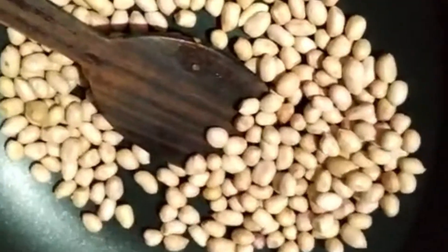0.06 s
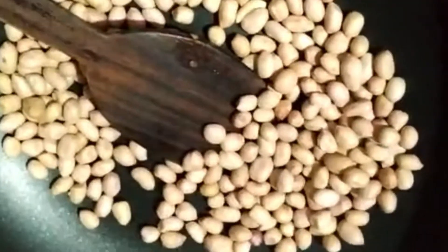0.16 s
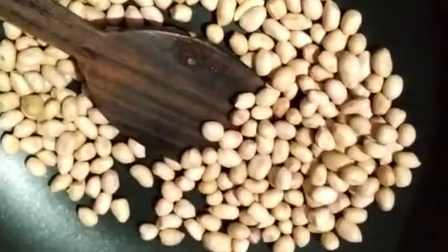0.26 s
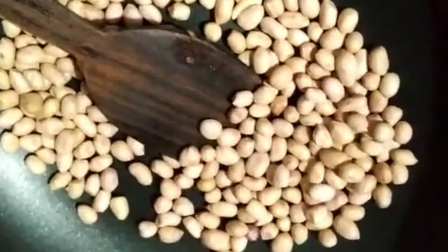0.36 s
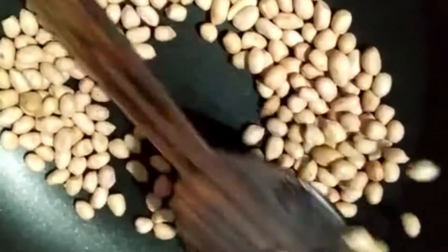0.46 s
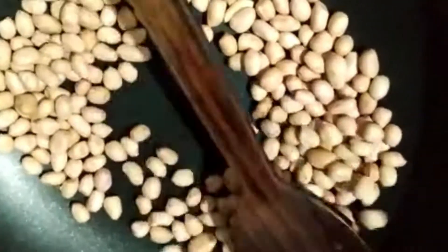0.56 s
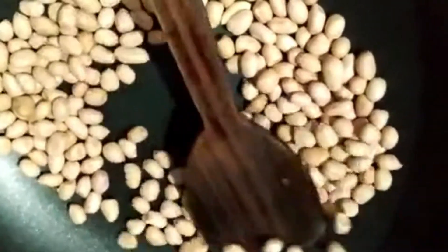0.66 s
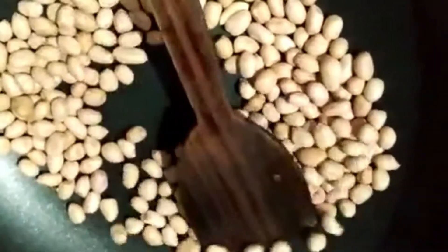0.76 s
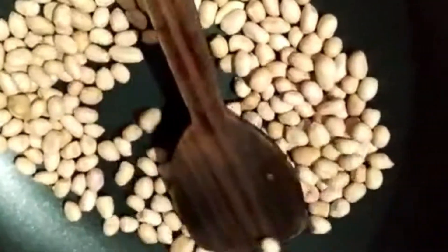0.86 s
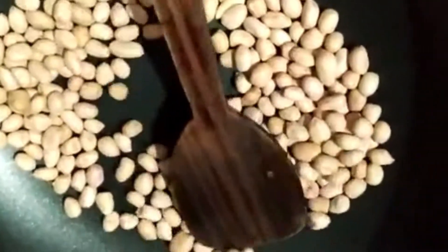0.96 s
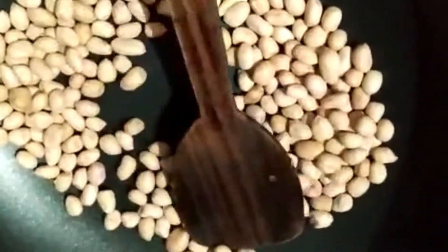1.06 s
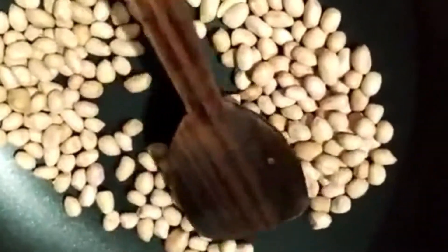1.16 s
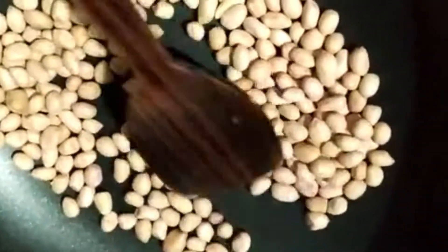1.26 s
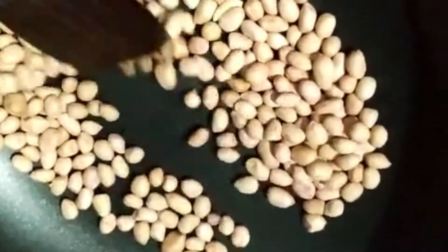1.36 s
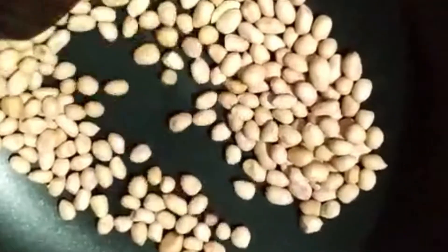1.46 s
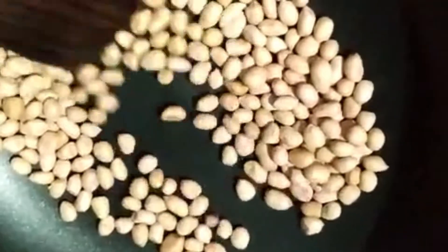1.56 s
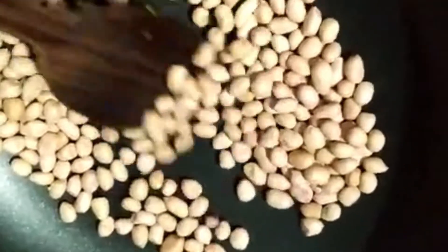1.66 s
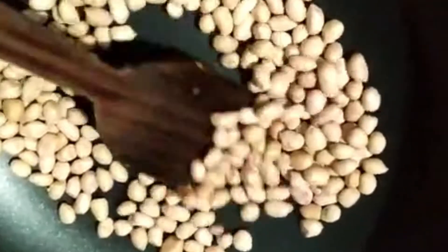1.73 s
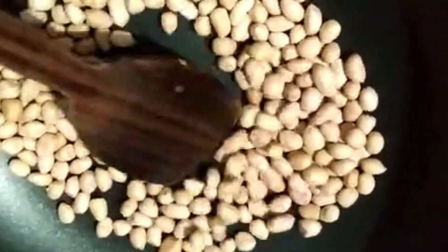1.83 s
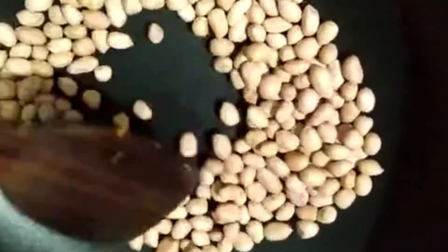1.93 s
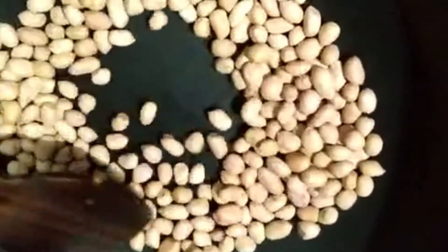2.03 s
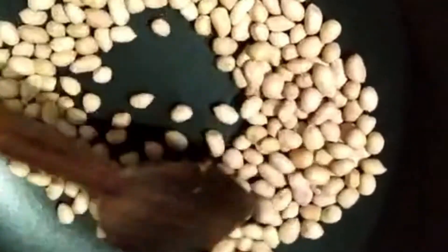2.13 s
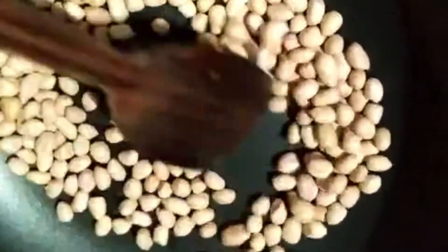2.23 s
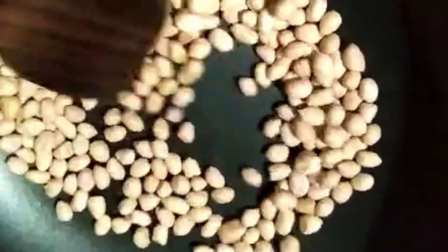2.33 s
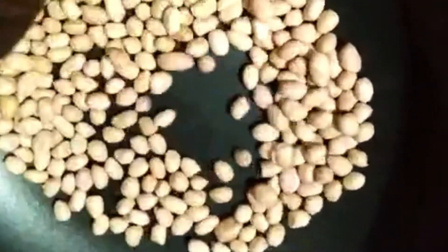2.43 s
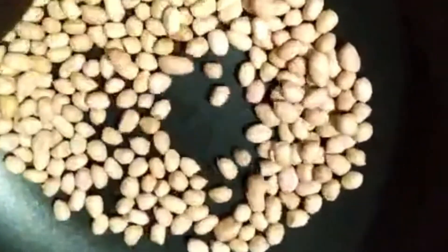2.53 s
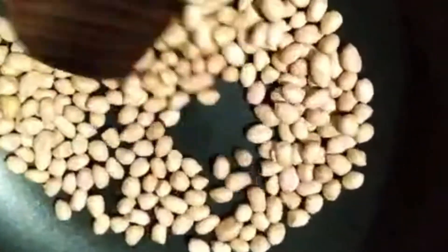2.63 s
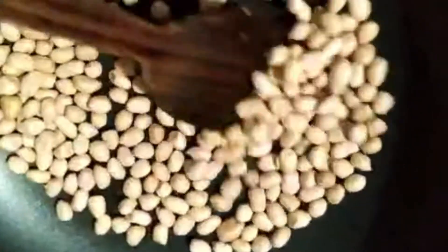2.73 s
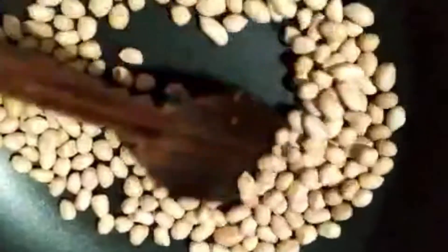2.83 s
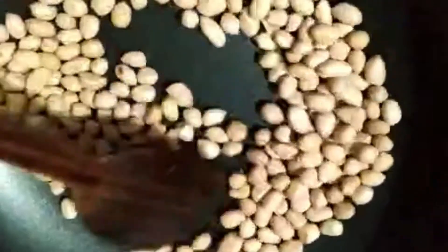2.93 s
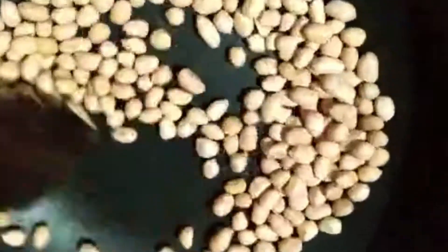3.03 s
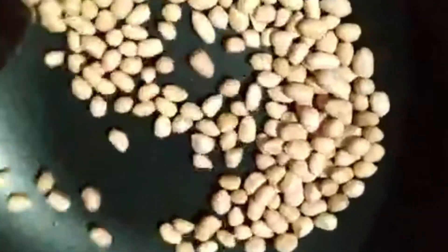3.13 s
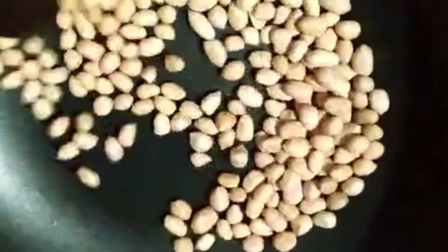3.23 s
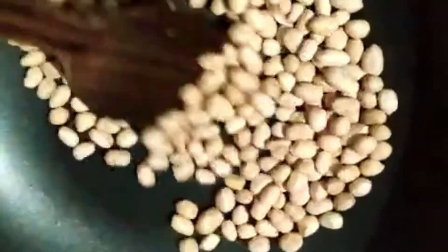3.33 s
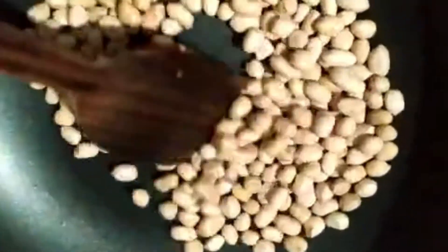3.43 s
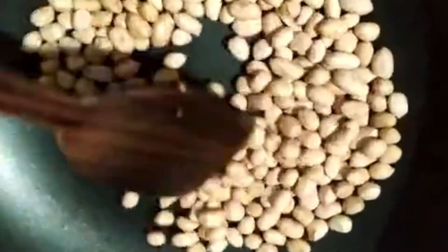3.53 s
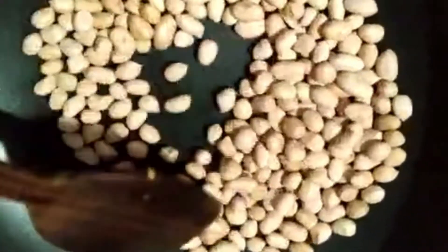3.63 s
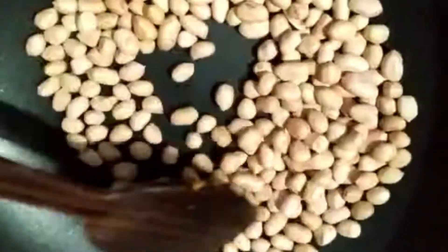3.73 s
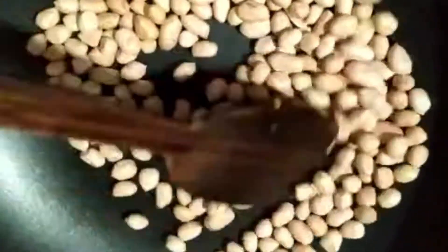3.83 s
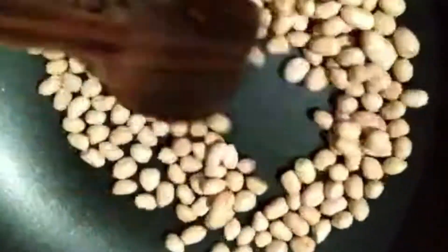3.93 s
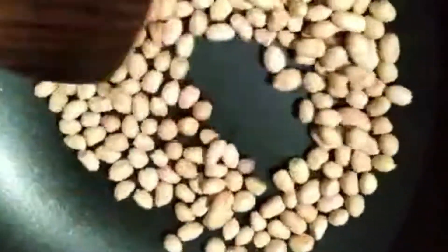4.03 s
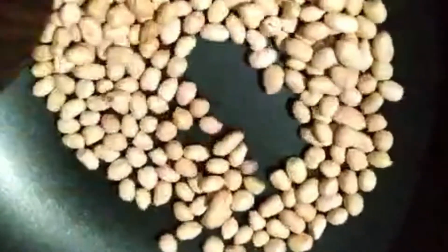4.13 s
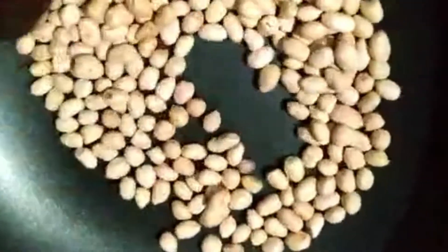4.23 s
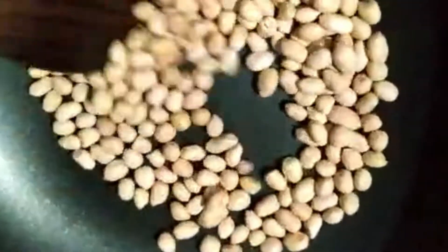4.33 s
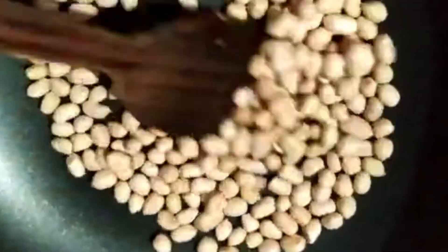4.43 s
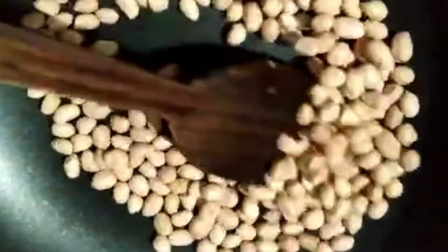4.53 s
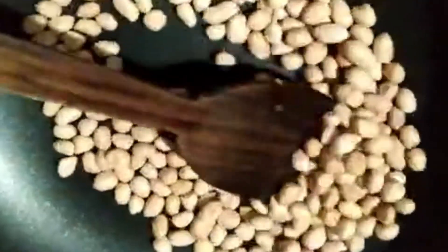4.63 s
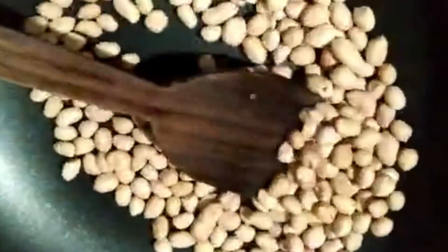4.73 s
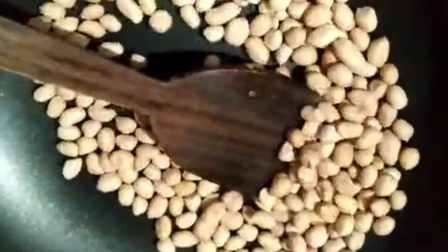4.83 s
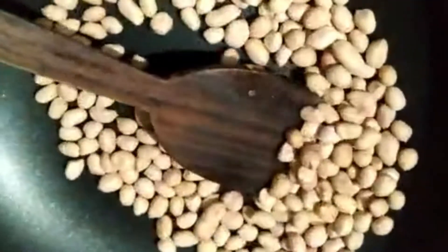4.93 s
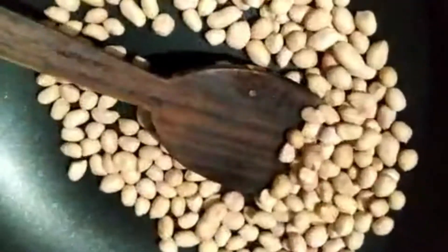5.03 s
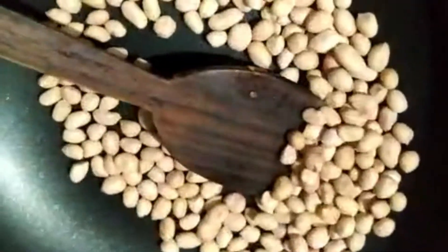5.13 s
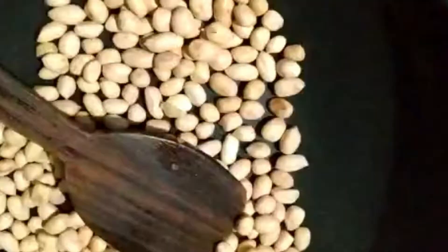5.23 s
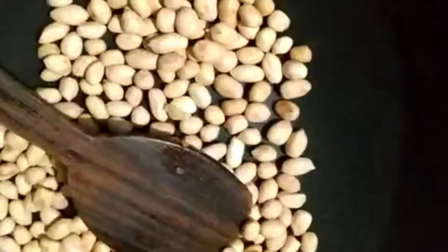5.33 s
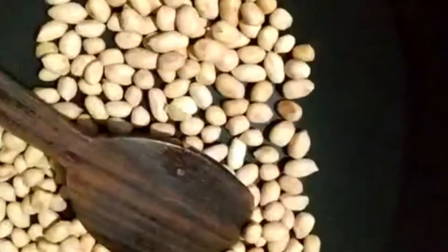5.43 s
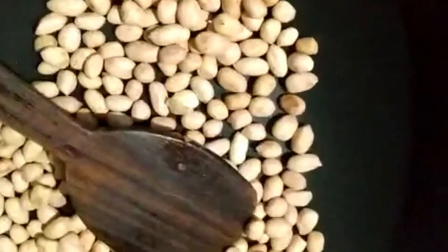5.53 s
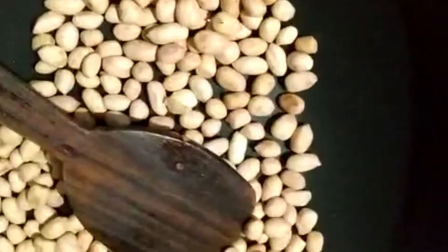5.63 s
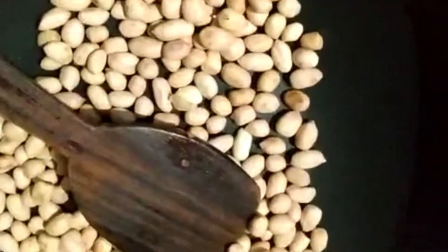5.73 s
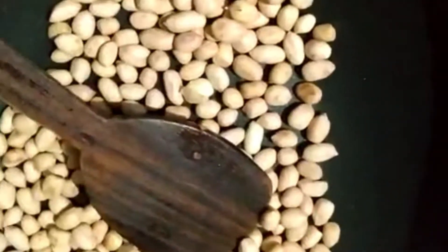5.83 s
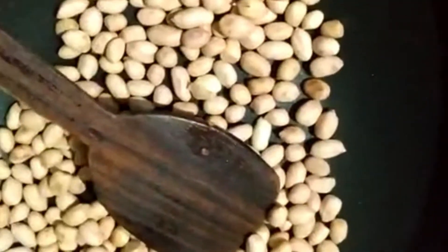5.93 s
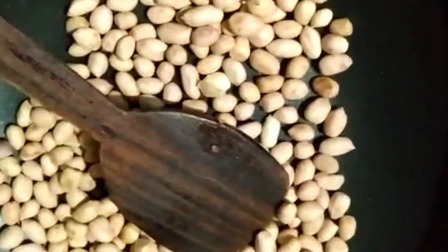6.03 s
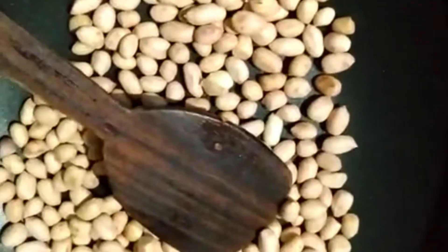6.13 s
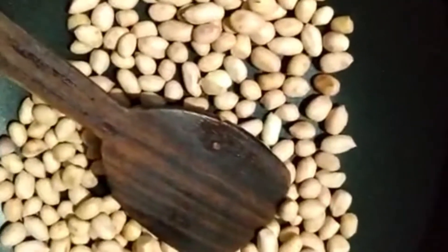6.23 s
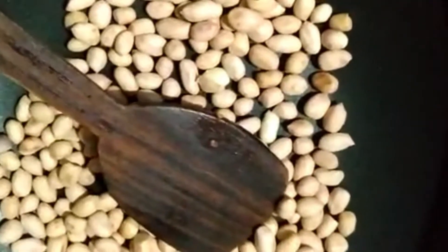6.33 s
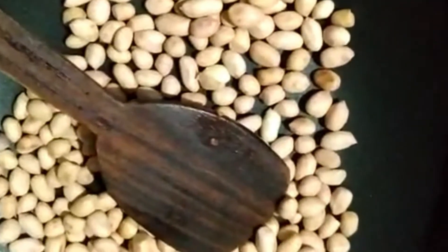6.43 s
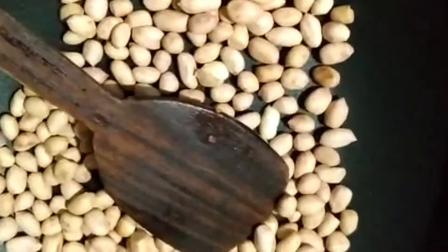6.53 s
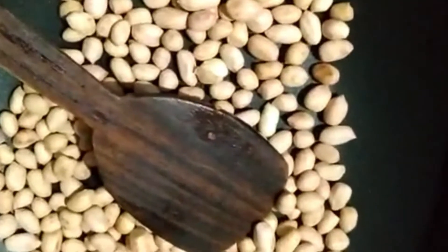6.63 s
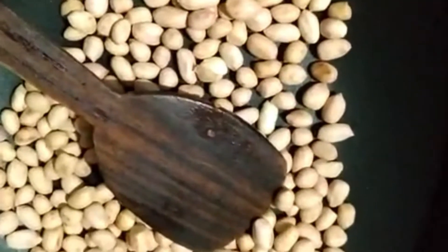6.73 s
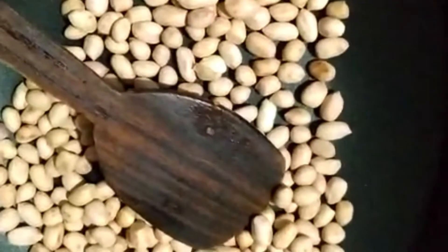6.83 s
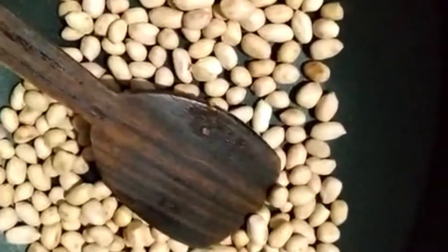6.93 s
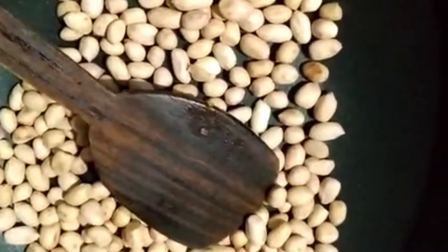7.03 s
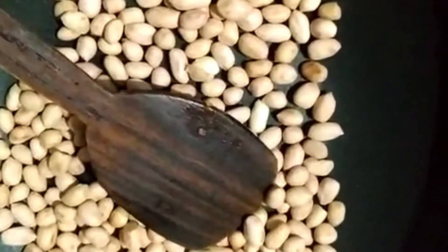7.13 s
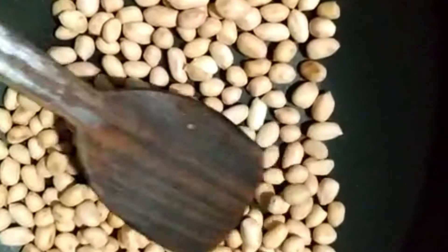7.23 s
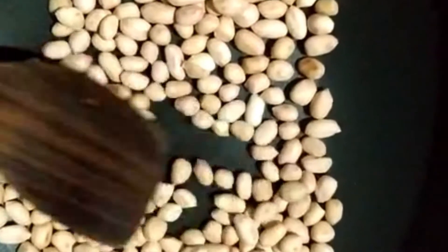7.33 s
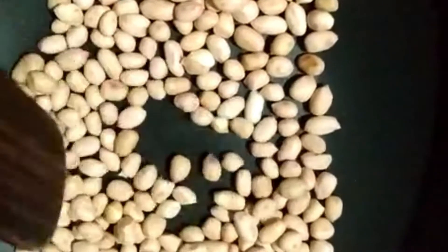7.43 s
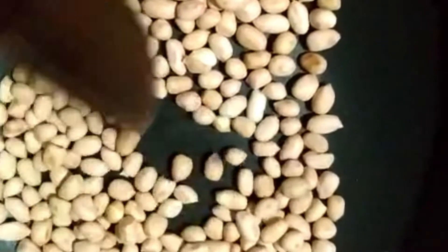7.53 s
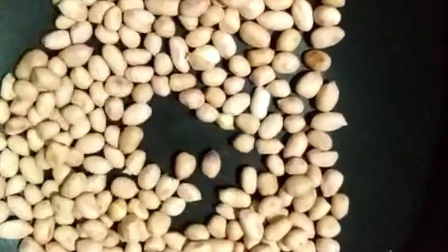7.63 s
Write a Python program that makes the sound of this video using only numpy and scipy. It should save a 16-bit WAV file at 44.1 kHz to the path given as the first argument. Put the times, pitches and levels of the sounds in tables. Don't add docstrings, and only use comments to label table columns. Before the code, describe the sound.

Raw peanuts rattle and tick in a dry metal pan as a wooden spatula knocks, slaps and scrapes, over a faint low motor hum.

```python
import sys
import numpy as np
from scipy import signal
from scipy.fft import rfft, irfft
from scipy.io import wavfile
from scipy.ndimage import uniform_filter1d

SR = 44100
rng = np.random.default_rng(int(sys.argv[2]) if len(sys.argv) > 2 else 0)


def output_pcm(signal):
    pcm = np.clip(np.atleast_2d(signal).T, -1, 1) * 32767
    wavfile.write(sys.argv[1], SR, np.round(pcm).astype(np.int16))


def to_linear_factor(level_db):
    exponent = np.asarray(level_db, float) / 20
    return 10 ** exponent


N = 338699
T = np.arange(N) / SR
F = np.fft.rfftfreq(N, 1 / SR)
OPPOSITE = np.array([[1], [-1]])

# f/Hz, level/dB per Hz
AIR = [(110, -15), (160, 7), (230, -2.5), (340, 0), (720, -9), (1600, -14), (2500, -17), (4000, -25.5),
       (6500, -28), (9000, -26), (13000, -28.5), (15500, -25)]
# f/Hz, width/Hz, level/dB
WHINES = [(4700, 150, -80.5), (7450, 380, -73), (10100, 170, -74), (335.6, 16, -63)]
# t/s, level/dB
JOLTS = [
    (.2, -35.5),
    (1.35, -42),
    (1.88, -43),
    (2.3, -41.5),
    (2.44, -47),
    (2.93, -47.5),
    (4.06, -42),
    (4.38, -57.5),
    (6.29, -48),
    (7.41, -43.5),
]
# f/Hz, spread/rad
LEAD = [(200, -21.5), (1000, 1.37), (2200, 1.05), (5000, 2), (15000, 0.5)]
# f/Hz, left minus right level/dB
TILT = [(60, 1.0), (110, -4), (200, 4.5), (380, -3), (700, 10.5), (1290, -9.5), (2380, 0.5), (4400, -6.5),
        (8120, -3.5), (15000, 0)]
# f/Hz, width/Hz, level/dB
BOWL = [(754, 270, -20.5), (929, 60, -4.5), (958, 32, -2.5), (1027, 19, 3.5), (1085, 58, 7.5),
        (1130, 58, -12.5), (1200, 79, -13.5), (1273, 50, -17.5)]
# f/Hz, width/Hz, level/dB
WALL = [(1596.6, 26, 2), (2097, 74, 7), (2338, 120, 2.5), (2617, 100, 3), (2864, 56, 2), (3404, 63, 0.5),
        (3933, 66, 1)]
# f/Hz, width/Hz, level/dB
RIM = [(4660, 120, -31), (4570, 67, -4), (5030, 50, 0), (5570, 92, 1.5), (6710, 18, -9.5), (7040, 360, 1),
       (7740, 70, -16), (8270, 42, -5), (8580, 83, -10.5), (9360, 41, -9), (9820, 340, -4.5),
       (10000, 350, -29.5), (10900, 79, -46.5), (11900, 190, -10)]
# f/Hz, level/dB per Hz
CRACK = [(180, -39), (300, -8.5), (603, -9), (1100, -10.5), (1480, 11.5), (4990, -15), (7570, -17),
         (8640, -15.5), (13300, -22.5), (16000, -27)]
# t/s, peak level/dB
BUMPS = [(.173, -24), (.2908, -22), (.3115, -12), (.3327, -11.5), (.4069, -20.5), (1.3169, -26),
         (1.3447, -35), (2.2731, -22), (2.292, -33), (2.3252, -24.5), (3.0014, -22.5), (3.0287, -24),
         (3.5608, -29), (3.9721, -25), (4.0188, -32), (5.0332, -43.5), (5.154, -50), (7.374, -29),
         (7.4574, -33)]
# t/s, peak level/dB
SLAPS = [
    (0.2907, -5.5),
    (1.3453, -11),
    (2.4236, -12),
    (2.7583, -19),
    (3.4047, -27.5),
    (4.118, -8.5),
    (7.4938, -6),
]
# t/s, peak level/dB, bowl level/dB re peak, bright level/dB re peak, bowl pitch f/Hz
BLOWS = [(.1507, -38, 14.5, 4, 850), (.173, -18, 9.5, 1, 900), (0.2901, -14.5, 3, 0, 1200),
         (0.3116, -21.5, 6, -11, 887), (.3327, -19, 7.5, -1.5, 803), (.378, -13.5, -13, -0.5, 1145),
         (.4069, -19, -7, -24, 1210), (1.0855, -8.5, -14.5, -10.5, 990), (1.3153, -16.5, -25, -10, 1030),
         (1.3447, -10.5, 4.5, 2.5, 996), (1.386, -18.5, 3.5, 0, 1130), (1.4199, -11.5, 1.5, -29, 1097),
         (1.459, -25, 9, -15, 1000), (2.293, -38, -16, 9, 920), (2.4215, -4.5, -1.5, -9, 1031),
         (3.0014, -29.5, 17, -18, 688), (3.0285, -22, 1, -2, 1030), (3.0682, -8.5, -14, -4.5, 1110),
         (3.9717, -24, -20, -3.5, 880), (4.118, -5.5, -2, -16.5, 1070), (4.1533, -17.5, 7, -9.5, 1140),
         (7.374, -33.5, 3.5, 2.5, 610), (7.458, -14, 0, -14, 1050), (7.493, -13.5, 12.5, 3.5, 1010)]
# t/s, peak level/dB, bowl level/dB re peak
DROPS = [(0.4545, -18, -15), (0.635, -28, 6), (0.779, -27, -1), (1.0306, -18, -12), (1.064, -18, -13),
         (1.1578, -20.5, -4.5), (1.7694, -26, -12), (2.124, -28.5, 5.5), (2.218, -20.5, -34),
         (2.6381, -13, -25), (2.7591, -17.5, -5), (2.837, -23, -17), (3.1977, -17.5, -5),
         (3.3122, -18, -1.5), (3.4038, -25, -8.5), (3.641, -19, -12), (4.0714, -13, -9), (4.265, -30, -5),
         (4.2841, -25, 3), (4.3254, -14.5, -32), (4.4779, -18.5, -6), (4.51, -27.5, -3.5),
         (4.5273, -27, -7), (5.0318, -40, 0), (6.8637, -39.5, -7), (6.93, -51, 6), (7.428, -21.5, -9),
         (7.5694, -17.5, 3), (7.596, -17, -2), (7.617, -19.5, 0)]
# t/s, peak level/dB, bowl level/dB re peak, bright level/dB re peak
CLICKS = [(0.1238, -34.5, -10, -2.5), (0.2322, -35, -2, 4), (0.27, -29, -3, 4), (.5289, -29, -6, -4),
          (0.563, -39.5, 10.5, 2), (0.71, -40, 6, -4), (.9464, -30.5, -14, -3.5), (1.0036, -31, -9, -1.5),
          (1.2003, -35.5, 3.5, 0.5), (1.25, -33.5, -18, -7.5), (1.511, -39, -5, -3.5),
          (1.5428, -18.5, -17, -8.5), (1.5677, -19.5, -5.5, -11), (1.6254, -37, 4, -21),
          (1.6553, -20.5, -1, -10.5), (1.6909, -19.5, -0.5, -10), (1.721, -22.5, -5, -14),
          (1.9718, -19, -19, -8), (2.3266, -21, -6, -7), (2.3535, -20.5, -4.5, -10), (2.4013, -35, 12, -46),
          (2.6918, -37.5, 12, -9), (2.9226, -16.5, -29, -30), (2.9644, -31, -8, -0.5),
          (3.69, -24.5, -7, -2), (3.8588, -27, -2.5, -13), (4.431, -16, -13, -15), (5.154, -55.5, 12, -10),
          (7.6367, -33, 12, -12), (7.66, -35, 9, -14)]
# t/s, peak level/dB
MORE_NUTS = [(1.8922, -29), (1.926, -38), (2.254, -38), (2.614, -37), (3.14, -26), (3.51, -36), (3.745, -31.5),
             (3.901, -41), (4.0208, -26.5), (4.462, -51), (6.89, -58), (7.114, -54)]
# fastest t/s, level/dB, rise t/s, fall t/s, scrape level/dB re level
STROKES = [(.175, -26.5, 0.059, 0.09, -26), (.235, -39, 0.018, 0.055, 18),
           (0.309, -21.5, 0.049, 0.076, -18), (.38, -28.5, 0.12, 0.12, 1), (0.458, -39, 0.11, 0.58, -6.5),
           (1.078, -25, .11, 0.16, -9), (1.36, -28, .03, 0.35, -9), (1.429, -25, 0.17, 0.12, -5),
           (1.65, -46, 1, .25, -10), (2.032, -30.5, 0.24, 0.17, -2), (2.3, -37, 1, .3, -13),
           (2.439, -20, 0.077, .08, -5), (2.77, -31.5, 0.41, 0.24, -3), (3.058, -16.5, 0.062, .11, -8),
           (3.268, -29.5, 0.98, 0.074, -14), (3.52, -39.5, 0.15, 0.38, -2), (3.708, -23.5, 0.13, 0.12, -13),
           (4.135, -15.5, 0.028, 0.13, -7.5), (4.35, -32.5, 0.6, 0.23, -9.5), (4.5, -48.5, .3, 0.12, -11.5),
           (6.87, -55.5, .02, 0.24, -7), (7.066, -31.5, 0.072, 0.076, -27.5),
           (7.451, -30.5, 0.05, 0.18, -13), (7.55, -30, .055, 0.38, -2)]


def unit(x):
    return x / np.sqrt(np.mean(x ** 2))


def over_hz(table, hz):
    f, v = np.transpose(table)
    return np.interp(np.log(np.maximum(hz, 1)), np.log(np.maximum(f, 1)), v)


def shaped(x, gain):
    return irfft(rfft(x) * gain, N)


def walk(rate):
    hold = int(SR / rate)
    steps = np.repeat(rng.standard_normal(N // hold + 1), hold)
    return 1.69 * uniform_filter1d(uniform_filter1d(steps, hold), hold)[:N]


def swells(s, db, rise_s, fall_s, rest_db):
    edge_db, edge_bend = 20, 1.243
    late = T - s[:, None]
    edge = np.where(late < 0, -late / np.abs(rise_s)[:, None], late / np.abs(fall_s)[:, None])
    swell_db = db[:, None] - edge_db * np.minimum(edge, 9) ** edge_bend
    return 10 * np.log10(np.sum(to_linear_factor(swell_db) ** 2, axis=0) + to_linear_factor(rest_db) ** 2)


def room_air():
    mid, side = rng.standard_normal((2, N))
    apart = np.clip(F / 890.0, .2, 1)
    colour = to_linear_factor(over_hz(AIR, F)) * (F > 100)
    air = shaped(mid, colour) + shaped(side, colour * apart) * OPPOSITE
    return unit(air) * to_linear_factor(-54 + 0.24 * walk(0.88))


def whines():
    out = np.zeros((2, N))
    for hz, width, db in WHINES:
        resonance = 1 / (1 + (2 * (F - hz) / width) ** 2)
        out += to_linear_factor(db) * unit(shaped(rng.standard_normal((2, N)), resonance))
    return out


def motor_hum():
    hum_hz, hum_db, waver_db = 183.4, -48.5, 1.6
    turn = 2 * np.pi * np.cumsum(hum_hz + 0.44 * walk(6.1)) / SR
    port_db = np.array([[-.6], [.6]])
    return np.sqrt(2) * np.sin(turn) * to_linear_factor(hum_db + waver_db * walk(7) + port_db)


def hand_rumble():
    grip_db, rise_s, fall_s = -54, 0.14, 0.4
    slope = (F / 40.) ** 0.88 / (1 + (F / 60.) ** 3.43)
    grip, slip = (unit(shaped(v, slope)) for v in rng.standard_normal((2, N)))
    s, db = np.transpose(JOLTS)
    hand_db = swells(s, db, np.full(len(s), rise_s), np.full(len(s), fall_s), grip_db)
    creak_slope = (F / 300.) ** 2 / (1 + (F / 260.0) ** 4.6)
    creak = unit(shaped(rng.standard_normal(N), creak_slope))
    creak_db = 1.8 * (hand_db + 41) - 47.5 + 1.6 * walk(30)
    return to_linear_factor(hand_db) * (grip + .25 * slip * OPPOSITE) + to_linear_factor(creak_db) * creak


def kitchen_echo(pan):
    t60_s, echo_db = .25, -13
    t = np.arange(SR // 2) / SR
    same, other = rng.standard_normal((2, len(t))) * 1000 ** (-t / t60_s) * (t > .004)
    other = signal.sosfilt(signal.butter(2, 900, "high", fs=SR, output="sos"), other)
    tail = signal.lfilter([1], [1, -.4], same + .8 * other * OPPOSITE)
    tail = tail / np.sqrt(np.sum(tail[0] ** 2))
    return to_linear_factor(echo_db) * signal.fftconvolve(pan, tail, axes=1)[:, :N]


def ports(z, hz, lag):
    half = np.exp(.5j * over_hz(LEAD, hz) * lag) * to_linear_factor(over_hz(TILT, hz) / 2)
    return np.array([(z * half).imag, (z / half).imag])


def ring(at, size, modes, spot_db, damp):
    spot = rng.standard_normal((len(at), 2 * len(modes)))
    out = 0
    for k, (hz, width, db) in enumerate(modes):
        push = np.zeros(N, complex)
        loaded_db = 2.44 * np.clip(hz / 4000, .3, 1) * walk(7)
        gain = to_linear_factor(db + spot_db * spot[:, 2 * k] + loaded_db[at])
        np.add.at(push, at, size * gain * np.exp(.3j * spot[:, 2 * k + 1]))
        pole = np.exp((2j * hz - damp * width) * np.pi / SR)
        out = out + ports(signal.lfilter([1], [1, -pole], push), hz, walk(3))
    out = signal.sosfilt(signal.butter(3, .8 * modes[0][0], "high", fs=SR, output="sos"), out)
    return out / np.sqrt(np.sum(to_linear_factor(np.array(modes)[:, 2]) ** 2))


def crack(at, size, tau_s, alike, lo_hz):
    push = np.zeros(N)
    np.add.at(push, at, size ** 2)
    fade = np.sqrt(signal.lfilter([1], [1, -np.exp(-2 / (tau_s * SR))], push))
    colour = to_linear_factor(over_hz(CRACK, F)) / np.sqrt(1 + (lo_hz / np.maximum(F, 1)) ** 6)
    a, b = (unit(shaped(rng.standard_normal(N), colour)) for _ in range(2))
    lag = np.interp(F, np.arange(40) * 600, rng.standard_normal(40))
    late = shaped(a, np.exp(-1j * over_hz(LEAD, F) * lag) * to_linear_factor(-over_hz(TILT, F)))
    return fade * np.array([a, alike * late + np.sqrt(1 - alike ** 2) * b])


def spatula_wood():
    out = np.zeros((2, N))
    t = np.arange(2000) / SR
    thud = np.sin(2 * np.pi * 420 * t) * np.exp(-t / 0.0016) * (1 - np.exp(-t / 0.0004))
    slap = np.sin(2 * np.pi * 1300 * t) * np.exp(-t / 0.00074)
    for shape, table in ((thud, BUMPS), (slap, SLAPS)):
        for when, peak_db in table:
            start = int(when * SR)
            out[:, start:start + len(t)] += to_linear_factor(peak_db) * shape
    return out


def bowl_notes(first, bowl_hz, note_db):
    out = np.zeros((2, N))
    t = np.arange(2000) / SR
    fade = np.exp(-t / 0.0037) * (1 - np.exp(-t / 0.0026))
    for i, hz, db in zip(first, bowl_hz, note_db):
        note = ports(to_linear_factor(db) * np.exp(2j * np.pi * hz * t) * fade, hz, rng.standard_normal())
        out[:, i:i + len(t)] += note[:, :N - i]
    return out


def knocks():
    drop_bright_db, more_bowl_db, more_bright_db = -25, -7, -6.5
    nuts = [(*row, drop_bright_db) for row in DROPS] + CLICKS
    nuts = nuts + [(*row, more_bowl_db, more_bright_db) for row in MORE_NUTS]
    nut_hz = 1073 * (1 + .03 * rng.standard_normal(len(nuts)))
    blows = BLOWS + [(*row, hz) for row, hz in zip(nuts, nut_hz)]
    s, db, bowl_db, bright_db, bowl_hz = np.transpose(blows)
    first = (s * SR).astype(int)
    rock = np.array([0, .002, .005]) * SR * rng.uniform(0.46, 1.4, (len(s), 3))
    at = (first[:, None] + rock).astype(int).ravel()
    share_db = np.array([-2.5, -6.0, -9.0])
    levels = (db, db + bright_db, db + bowl_db)
    wall, bright, bowl = (to_linear_factor(v[:, None] + share_db).ravel() for v in levels)
    out = ring(at, wall * to_linear_factor(-5.0), WALL, 2.2, 0.93)
    out += ring(at, bright * to_linear_factor(-0.5), RIM, 4.0, 1.3)
    out += ring(at, bowl * to_linear_factor(-7.0), BOWL, 4.0, 2.6)
    out += crack(at, bright * to_linear_factor(-4.5), 0.0068, 0.59, 4400.0)
    out += crack(at, wall * to_linear_factor(-21.5), 0.0032, 0.46, 1200.)
    return out + bowl_notes(first, bowl_hz, db + bowl_db + 5.0)


def rolling_nuts():
    ticks_per_s, rest_db = 700, -92.5
    s, db, rise_s, fall_s, scrape_db = np.transpose(STROKES)
    bowl_db = swells(s, db, rise_s, fall_s, rest_db)
    wall_db = swells(s, db + 0.5 + 0.3 * scrape_db, rise_s, fall_s, rest_db)
    hiss_db = swells(s, db + scrape_db, rise_s, fall_s, rest_db)
    surge = walk(35)
    # mechanism, level curve, its settings, trim in dB
    layers = [(ring, bowl_db, (BOWL, 4.0, 1.2), -1.8),
              (ring, wall_db, (WALL, 5.0, .9), -2.0),
              (ring, hiss_db, (RIM, 5.0, 2.6), -4.5),
              (crack, hiss_db, (.004, .8, 4500.), -8.0),
              (crack, wall_db, (.005, .9, 1500.), -15.0)]
    out = 0
    for mechanism, curve_db, settings, trim_db in layers:
        when, chance = rng.random((2, int(ticks_per_s * N / SR)))
        at = (when * N).astype(int)
        tick_db = -2.8 * np.log(1 - chance)
        size = to_linear_factor(tick_db + 1.85 * surge[at] + 0.68 * walk(25.06)[at])
        out = out + unit(mechanism(at, size, *settings)) * to_linear_factor(trim_db + curve_db)
    return out


def scene():
    background = room_air() + whines() + motor_hum() + hand_rumble()
    pan = spatula_wood() + knocks() + rolling_nuts()
    return pan + kitchen_echo(pan) + background


def band_limit(x):
    return signal.sosfilt(signal.butter(12, 16810, fs=SR, output="sos"), x)


def record(dry):
    top_hz, slope_hz = 15750, 300
    rounded = 1.2 * np.tanh(dry / 1.2)
    mix = shaped(rounded, np.clip((top_hz + slope_hz - F) / slope_hz, .003, 1))
    return band_limit(mix)


dry = scene()
out = record(dry)
output_pcm(out)
```